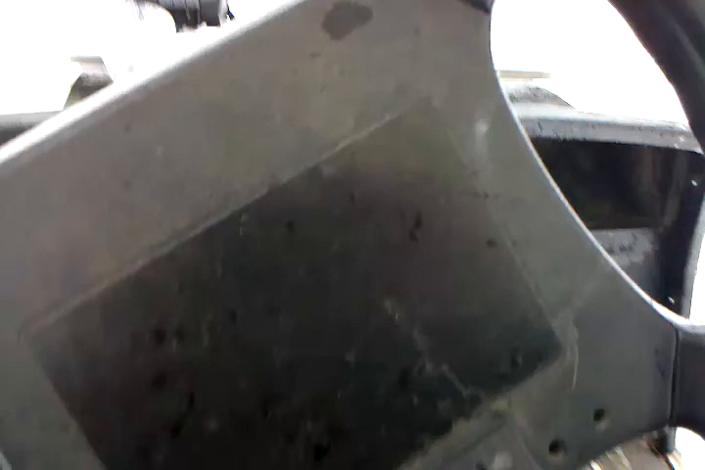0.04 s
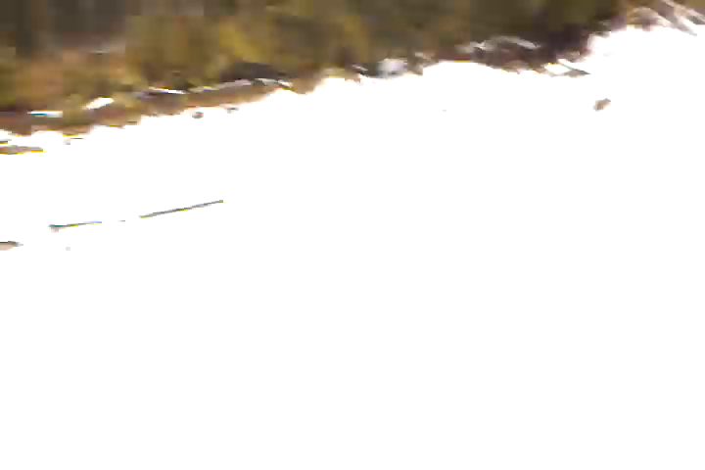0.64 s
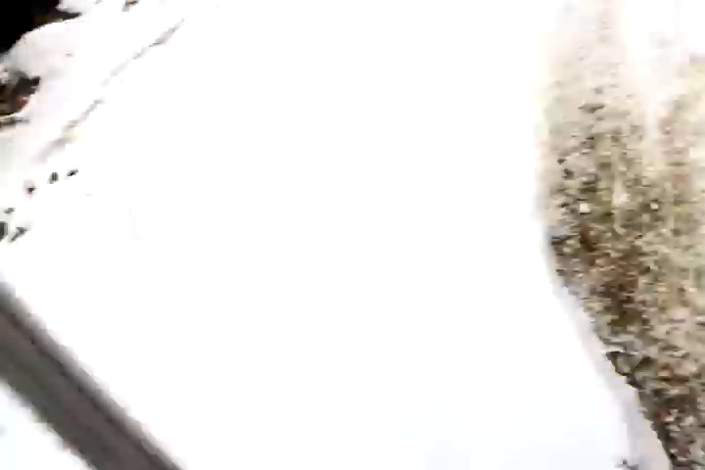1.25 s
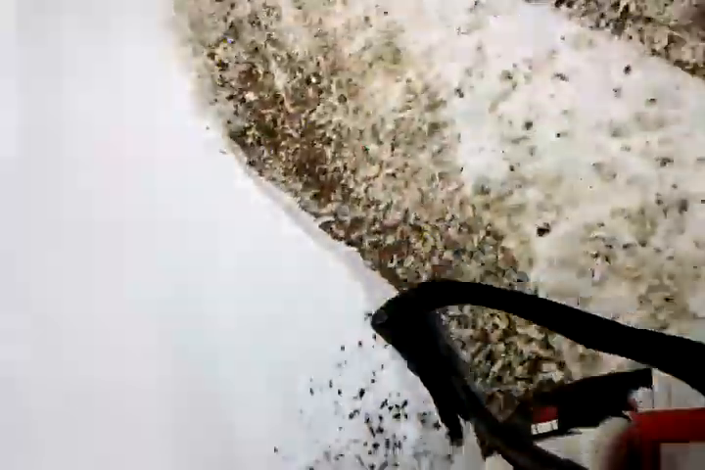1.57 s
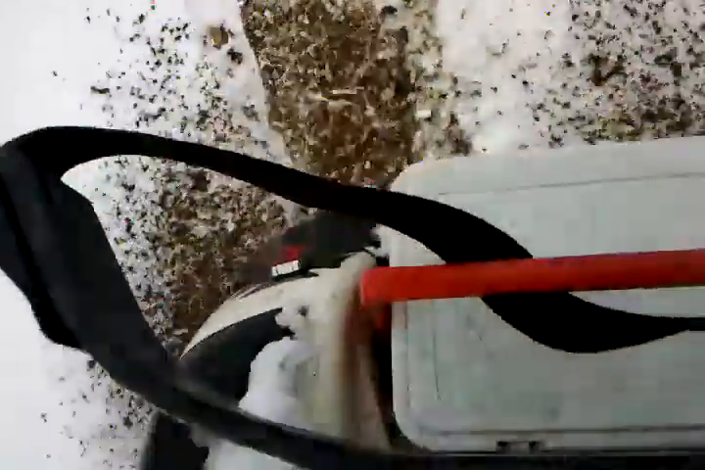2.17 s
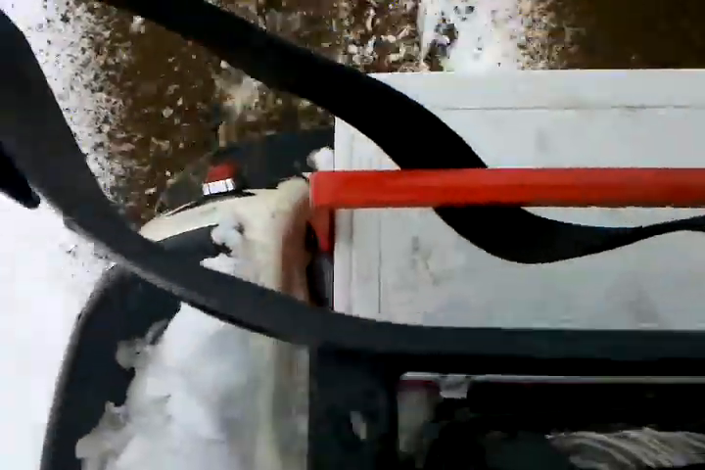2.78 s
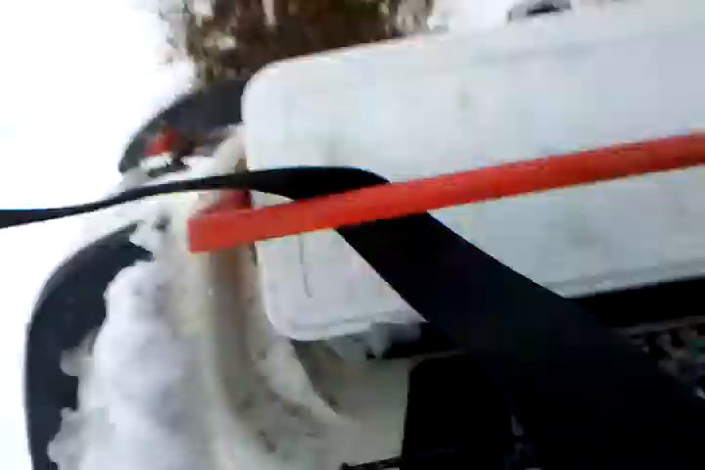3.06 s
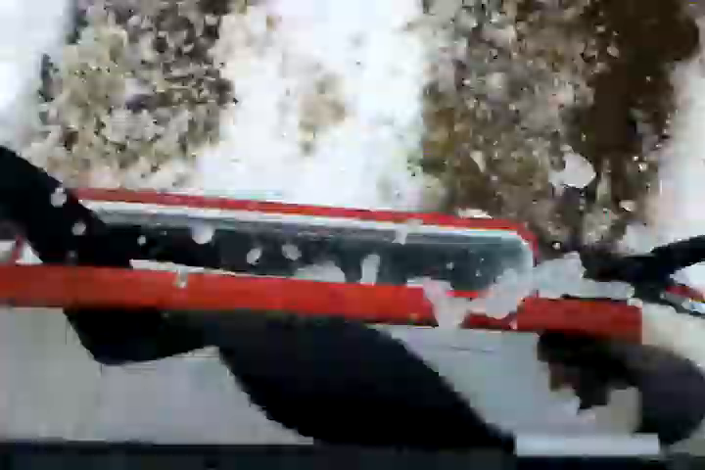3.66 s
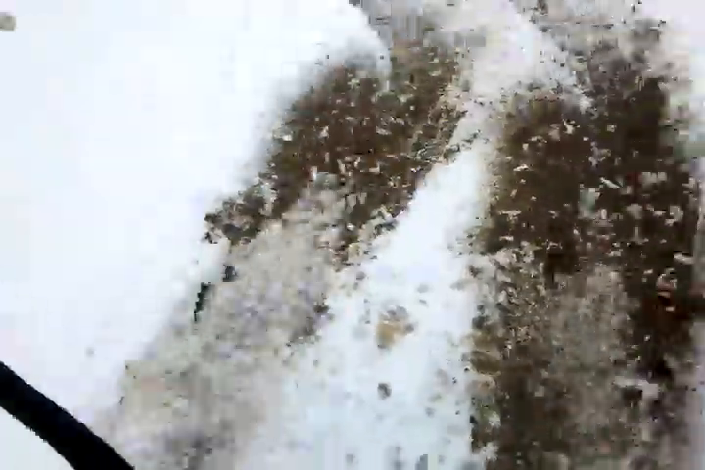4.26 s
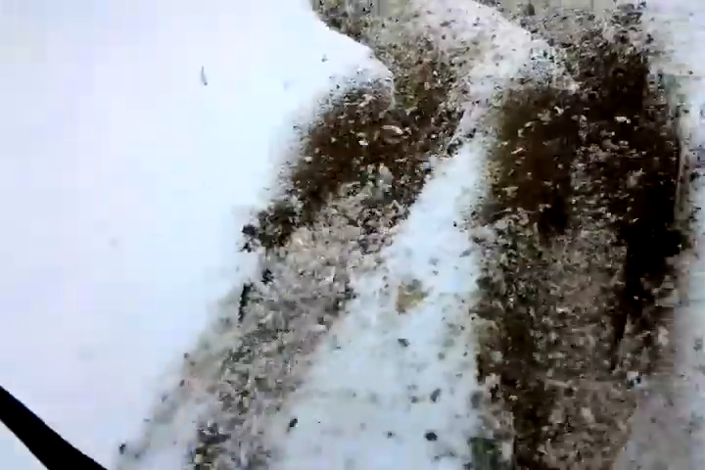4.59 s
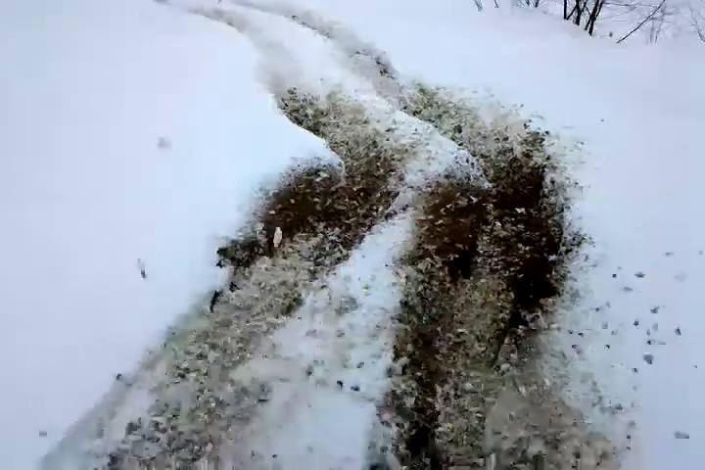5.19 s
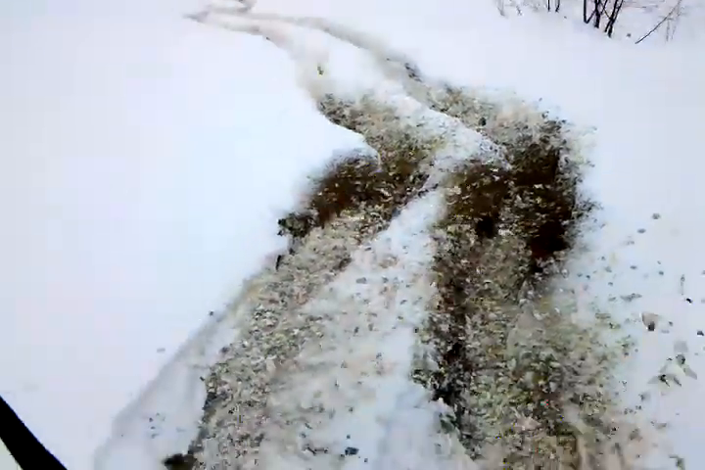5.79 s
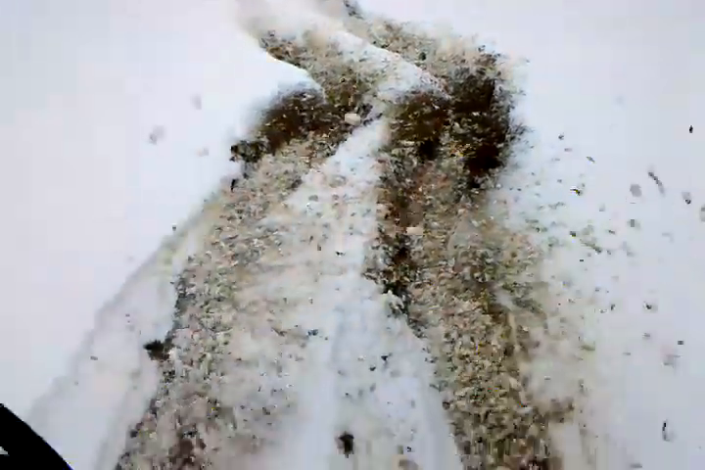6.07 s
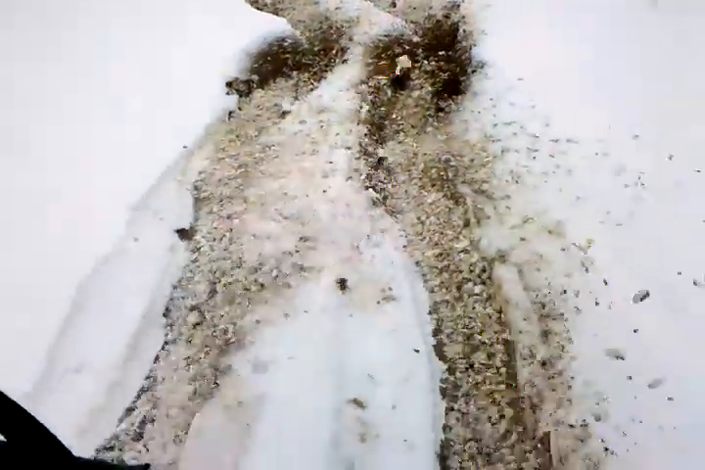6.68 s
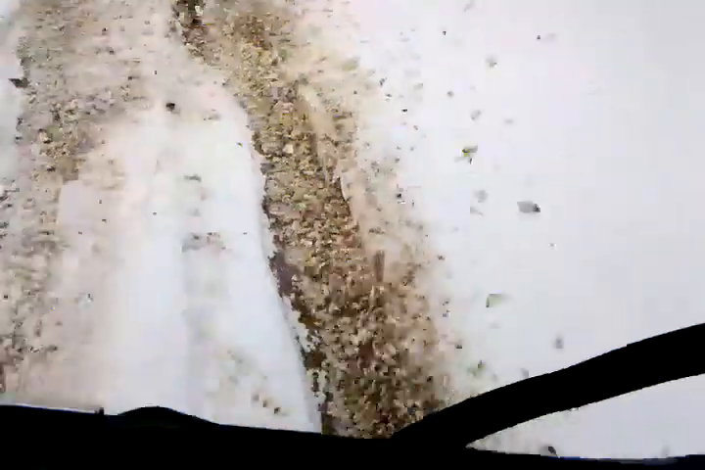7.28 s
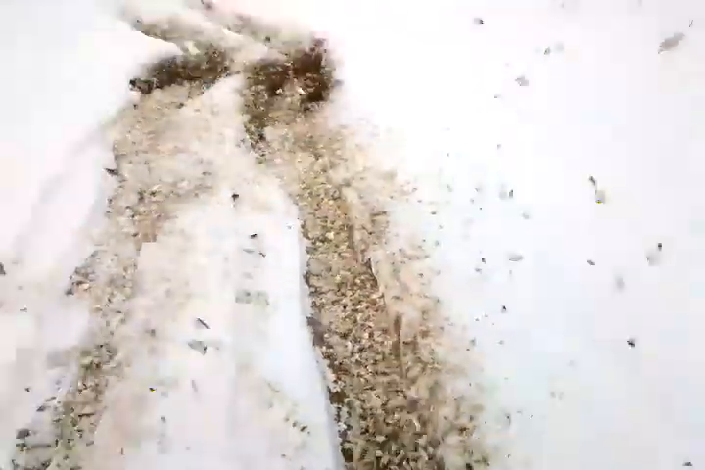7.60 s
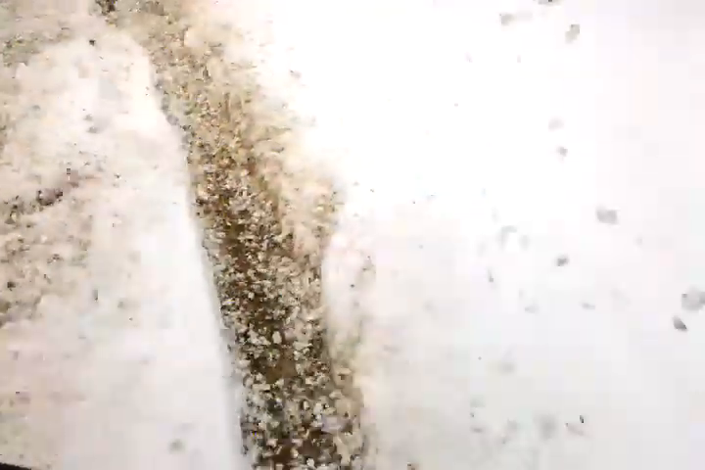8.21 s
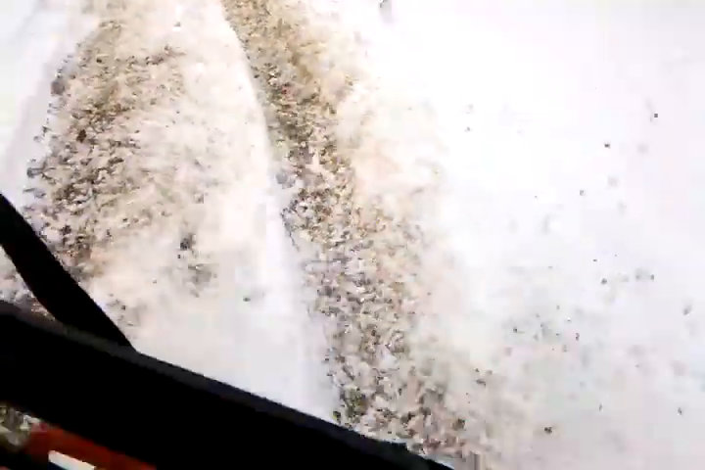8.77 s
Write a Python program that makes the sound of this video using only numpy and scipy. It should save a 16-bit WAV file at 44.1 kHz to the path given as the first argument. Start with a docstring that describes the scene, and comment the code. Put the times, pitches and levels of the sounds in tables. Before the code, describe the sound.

After a moment of silence, a golf cart's single-cylinder petrol engine cranks, catches and speeds up into a steady, thumping putter with a raspy exhaust and rattling covers. Wet snow crunches faintly under the tyres. Before the midpoint, a rut sets off a quick cluster of hollow plastic clacks and booms as the engine surges. It drones on, with two small ticks of grit. Heard outdoors from the seat through a small, slightly overloading microphone.

```python
"""A single-cylinder petrol engine starts and drives a golf cart along a slushy track, heard from the seat.
Each firing sends a pressure pulse through the muffler's resonances and lets out two rasps of turbulent
gas, while the engine forces its covers and mounts into vibration. The tyres crunch wet snow.
A rut jolts the hollow plastic body and its load, overloading the small microphone; later two grains
of grit tick and the sound skips once."""
import sys
import numpy as np
from scipy import signal
from scipy.fft import rfft, irfft, next_fast_len
from scipy.io import wavfile
from scipy.ndimage import uniform_filter1d

SR = 44100
rng = np.random.default_rng(int(sys.argv[2]) if len(sys.argv) > 2 else 0)


def wrap_up_sound(samples):
    """Save the sound to the file named by the first command line argument, as 16-bit audio."""
    columns = np.atleast_2d(samples).T
    # keep every value between -1 and 1, then stretch to whole-number steps
    tamed = np.clip(columns, -1, 1)
    steps = np.round(tamed * 32767).astype(np.int16)
    wavfile.write(sys.argv[1], SR, steps)


N = 389844
TIME = np.arange(N) / SR
FFT_SIZE = next_fast_len(N + SR // 2)
FREQ = np.maximum(np.arange(FFT_SIZE // 2 + 1) * SR / FFT_SIZE, 1e-3)

# engine speed: time_s, firing_hz
FIRING_RATE = [(0.8, 13.48), (1.08, 17.04), (1.38, 23.72), (1.9, 25.46), (2.65, 30.4), (3.15, 28.98),
               (3.33, 25.33), (3.52, 29.7), (4.12, 31.33), (4.92, 29.79), (5.76, 29.76), (5.82, 30.18),
               (6.26, 29.48), (6.75, 30.24), (7.74, 30.19), (8.55, 31.4), (8.84, 31.43)]
# body boom against the thump, as the microphone leans over the rear: time_s, boom_gain
REAR_LEAN = [(3.2, 0.072), (3.36, 0.93), (4.1, 0.71), (5.0, 0.034), (7.7, 0.044), (8.3, 0.46)]
# lift of the rasp as the microphone faces the tailpipe: time_s, lift_db
TAILPIPE_FACING = [(1.4, -4.5), (1.7, 6.5), (2.35, 6.5), (2.95, 1), (3.2, 7.5), (4.15, 8), (4.6, 0.5),
                   (6.1, -0.5), (7.4, 0.5), (8.84, -3)]
# muffler resonances: centre_hz, width_hz, lift_db
MUFFLER_MODES = [(61, 34, 19.5), (90, 15, -2), (141.7, 31, 5), (177, 36, 5), (212.3, 17, 5.5),
                 (237.2, 30.5, 6), (273.7, 37.6, 8.5)]
# resonances of the engine covers: centre_hz, width_hz, lift_db
COVER_MODES = [(426, 27, -3), (638, 20, 6.5), (935, 68, 2.5), (1630, 90, 3), (1920, 420, 2), (2842, 68, 4),
               (3545, 82, 3), (3977, 120, 4)]
# modes of the plastic body: centre_hz, width_hz, level_db
BODY_MODES = [(213, 57, 4.5), (444, 54, 1), (520, 58, -10), (925, 44, -24.5), (1490, 250, -22.5),
              (2220, 300, -28.5), (3200, 2800, -19)]
# mount tones against the thump, over the rear deck and over the track: firing_multiple, deck_db, track_db
MOUNT_TONES = [(11, -13, -10.5), (11.97, -16.5, -19), (13.1, -25, -15), (14.07, -21, -16.5),
               (15.96, -13.5, -27.5), (17, -22.5, -26.5), (18.05, -25.5, -25.5), (19.01, -22, -17.5),
               (21, -18.5, -17), (21.97, -22.5, -16), (23.97, -20.5, -23.5), (27.66, -22, -27.5),
               (33.5, -22.5, -39), (36.8, -38.5, -25.5)]
# spectral envelope of the clatter: frequency_hz, level_db
CLATTER_SPECTRUM = [(50, -50.5), (90, -17.5), (130, -2.5), (220, -3.5), (320, -4.5), (500, -6.5), (800, -8),
                    (1200, -10.5), (1800, -18), (2800, -18), (7000, -31.5)]
# spectral envelope of the gas noise: frequency_hz, level_db
RASP_SPECTRUM = [(200, -20.5), (700, -8), (1400, -4.5), (2300, -3), (3200, 2), (4700, 0.5), (5600, -1.5),
                 (6800, -9), (8000, -19.5)]
# loose panels that buzz for a while: start_s, end_s, centre_hz, nominal_width_hz, level_db
LOOSE_PANELS = [(1.1, 1.523, 658, 128, -31), (1.6, 3.096, 1040, 356, -31.5), (3.6, 4.85, 971, 68.3, -32.5),
                (3.9, 4.805, 1560, 122, -36), (4.5, 7.097, 2120, 163, -35.5),
                (7.3, 8.838, 1636, 102.5, -37.5), (7.7, 8.845, 1007, 80, -37)]
# blows to the body and its load: start_s, relative_clack_db, relative_boom_db, decay_s
RUT_JOLTS = [(3.234, -10.5, -11.5, 0.014), (3.48, -9, -12.5, 0.029), (3.556, -12.5, -16.5, 0.012),
             (3.604, -10, -12, 0.044), (3.623, -5.5, -12, .018), (3.645, -8, -9.5, 0.012),
             (3.666, -33.5, 2.5, 0.012), (3.687, -26, -9.5, 0.065), (3.864, -37.5, -13, 0.041),
             (3.91, -21.5, -24, 0.032), (3.959, -41, -23, 0.037)]
# impacts of grit: start_s, level_db
GRIT_TICKS = [(3.999, -1), (6.041, -8.5)]

START_S, CATCH_S, CRANKING_DB = 0.813, 1.107, -18.5  # cranking swells until the engine catches
CRUISE_HZ = 30  # firing rate
THUMP_DB, CLATTER_DB, RASP_DB = -17.5, -24, -27.5  # base levels at cruising speed
THUMP_RISE_DB, CLATTER_RISE_DB, RASP_RISE_DB = 12.5, 8, 15  # per doubling of engine speed
# the throttle opens briefly to pull the cart out of the rut
SURGE_S, SURGE_ATTACK_S, SURGE_RELEASE_S, SURGE_DB = 3.27, 0.064, 0.25, 6.5
SKIP_S, SKIP_LENGTH_S, TOP_HZ = 6.5148, 0.010, 15800


def undb(db):
    """Amplitude ratio of a level in decibels."""
    return 10 ** (np.asarray(db) / 20)


def curve(table):
    """Linear interpolation of (time_s, value) points."""
    return np.interp(TIME, *np.transpose(table))


def band(hz, width):
    """Response of a damped resonator, gain 1 at its centre."""
    return 1 / (1 + 1j * (FREQ ** 2 - hz ** 2) / (FREQ * width))


def lifts(modes):
    """Resonators in cascade, each raising or lowering its own band."""
    return np.prod([1 + (undb(db) - 1) * band(hz, width) for hz, width, db in modes], axis=0)


def colour(points):
    """Spectral envelope through (frequency_hz, level_db) points."""
    hz, db = np.transpose(points)
    return undb(np.interp(np.log(FREQ), np.log(hz), db))


def through(x, response):
    """Linear filtering: the spectrum is multiplied by a response."""
    return irfft(rfft(x, FFT_SIZE) * response, FFT_SIZE)[:N]


def delayed(x, lag_s):
    """Propagation delay along a longer path."""
    return np.interp(TIME - lag_s, TIME, x)


def unit(x):
    """Normalisation to rms 1."""
    return x / np.sqrt(np.mean(x ** 2))


def noise():
    """White Gaussian noise."""
    return rng.standard_normal(N)


def wander(rate_hz):
    """Continuous random fluctuation with a spread near 1."""
    return np.interp(TIME * rate_hz, np.arange(4096), rng.standard_normal(4096))


def per_cycle(cycles, spread_db):
    """Cycle-to-cycle variation: a random gain held for each firing."""
    return undb(spread_db * rng.standard_normal(1024))[cycles.astype(int)]


def puff(cycles, start, rise):
    """A periodic pulse that opens at phase `start`, peaks `rise` cycles later and decays."""
    age = (cycles - start) % 1 / rise
    return age ** 2 * np.exp(2 * (1 - age))


def body_response():
    """Modal superposition: the hollow plastic body responds as the sum of its modes."""
    return sum(undb(db) * band(hz, width) for hz, width, db in BODY_MODES)


def effort_db(firing_hz, rise_db):
    """Level against cruising: a power law of speed, lowered by cranking and raised by the throttle."""
    doublings = np.log2(firing_hz / CRUISE_HZ)
    cranking = np.interp(TIME, [START_S, CATCH_S], [1, 0])
    surge = np.interp(TIME - SURGE_S, [0, SURGE_ATTACK_S, SURGE_ATTACK_S + SURGE_RELEASE_S], [0, 1, 0])
    return rise_db * doublings + CRANKING_DB * cranking + SURGE_DB * surge


def exhaust_thump(cycles, firing_hz):
    """Monopole radiation: pressure follows the rate of change of the flow, filtered by the muffler."""
    # the valve opens; a weaker push from the piston follows, strongest as the engine labours at low speed
    blowdown = puff(cycles, start=-0.03, rise=0.0074) * per_cycle(cycles, spread_db=0.5)
    push = puff(cycles, start=0.3384, rise=0.0072) * per_cycle(cycles, spread_db=2.5)
    labour = np.interp(firing_hz, [24.5, 29], [0.45, 0.17])
    pressure = np.gradient(-blowdown - labour * push)
    pipe = band(134.3, 228) ** 2 * band(209.0, 260) / (1 + 1j * FREQ / 330)
    thump = unit(through(pressure, pipe * lifts(MUFFLER_MODES)))
    # reflections off canopy and body swell and fade as the microphone moves
    thump += sum(0.39 * wander(1.562) * delayed(thump, lag_s) for lag_s in (0.011, 0.017, 0.024))
    thump += curve(REAR_LEAN) * unit(through(thump, body_response()))
    running_rms = np.sqrt(uniform_filter1d(thump ** 2, size=SR // 3) + 1e-6)
    return thump / running_rms


def mount_and_belt_drone(cycles, firing_hz):
    """Forced vibration: the block shakes its mounts, and the belt whines, in step with the crank."""
    toward_track = np.interp(TIME, [3.9, 5.0], [0, 1])  # the microphone turns away from the deck
    mounts = 0
    for multiple, deck_db, track_db in MOUNT_TONES:
        # a tone grows as it passes through the body's strong panel mode
        resonance_db = 5 / (1 + ((multiple * firing_hz - 435) / 9) ** 2)
        level_db = deck_db + toward_track * (track_db - deck_db) + resonance_db + 2.3 * wander(5)
        phase = 2 * np.pi * (multiple * cycles + rng.random()) + 0.053 * wander(4.5)
        mounts += undb(level_db) * np.sin(phase)
    belt_db = np.interp(firing_hz, [29.6, 31], [-31, -20])
    belt = undb(belt_db) * np.sin(2 * np.pi * 32 * cycles + 0.15 * wander(10))
    speed_db = np.interp(firing_hz, [25.5, 29.3], [-9, 0])
    return np.sqrt(2) * (mounts + belt) * undb(speed_db)


def engine_clatter(cycles, covers_db):
    """Structure-borne sound: combustion and valve gear excite the covers and loose panels."""
    blows = puff(cycles, start=0.13, rise=0.15) + 0.97 * puff(cycles, start=0.51, rise=0.11)
    shake = (0.87 + blows * per_cycle(cycles, spread_db=0.64)) * undb(0.5 * wander(9))
    covers = colour(CLATTER_SPECTRUM) * lifts(COVER_MODES)
    clatter = unit(through(noise() * shake, covers)) * undb(covers_db)
    rattle = noise() * shake
    for start, end, hz, width, db in LOOSE_PANELS:
        fade = np.interp(TIME, [start - 0.15, start + 0.092, end - 0.1, end + 0.25], [0, 1, 1, 0])
        clatter += undb(db) * fade * unit(through(rattle, band(hz, 1.2 * width) ** 2))
    return clatter


def tailpipe_rasp(cycles, facing_db):
    """Turbulent jet noise: gas leaves at blowdown and again as the piston sweeps the cylinder."""
    blowdown = puff(cycles, start=0.12, rise=0.084) * per_cycle(cycles, spread_db=0.97)
    sweep = np.exp(-0.5 * ((cycles % 1 - 0.56) / 0.11) ** 2) * per_cycle(cycles, spread_db=1.0)
    # the puffs stand out most when the microphone faces the tailpipe
    steady_flow = np.interp(facing_db, [-2.5, 0, 6], [0.5, 0.35, 0.2])
    sharpness = np.interp(facing_db, [2.5, 6], [1.05, 1.45])
    flow = steady_flow + blowdown ** sharpness + 0.79 * sweep ** sharpness
    turbulence = noise() * flow * undb(0.6 * wander(450))
    gas = through(turbulence, colour(RASP_SPECTRUM) * lifts(COVER_MODES))
    # a nearby panel reflects it; the path wanders with the hand that holds the microphone
    return unit(gas + 0.39 * delayed(gas, lag_s=0.0031 + 0.000099 * wander(2)))


def starter_hum(cycles):
    """A rotational tone: the starter-generator's pitch rises with the engine it spins."""
    level_db = np.interp(TIME, [0.9, 1.03, 1.15, 1.35, 1.6], [-74, -34, -36, -31, -64])
    return np.sqrt(2) * undb(level_db) * np.sin(2 * np.pi * 5 * cycles)


def tyre_slush():
    """Shot noise: wet snow crunches under the rolling tyres in dense random impulses."""
    grains_per_s = 900
    grains = noise() * (rng.random(N) < grains_per_s / SR)
    grains *= undb(1.8 * np.minimum(rng.exponential(size=N), 4))
    rolling = np.clip((TIME - 1.1) / 3.6, 0, 1)
    return unit(through(grains, band(3200, 4000))) * rolling * undb(-41.5 + 2 * wander(5.9))


def knock(start_s, decay_s):
    """Envelope of a damped impact: a sudden rise and an exponential fall."""
    age = np.maximum(TIME - start_s, 0)
    return (1 - np.exp(-age / 0.00082)) * np.exp(-age / decay_s)


def rut_jolts():
    """Impact excitation: loose parts clack on the body, whose panels boom over a dull chassis thud."""
    clack_envelope = sum(undb(db) * knock(start, decay) for start, db, _, decay in RUT_JOLTS)
    boom_envelope = sum(undb(db) * knock(start, decay) for start, _, db, decay in RUT_JOLTS)
    panels = unit(through(noise(), body_response()))
    chassis = undb(-41) * unit(through(noise(), band(77, 77) ** 2))
    clacks = clack_envelope * unit(through(noise(), band(1200, 1900) * band(1600, 8500)))
    # the blows reach mainly the middle modes of the panels
    boom = through(boom_envelope * (panels + chassis), band(420, 350))
    return undb(-4.5) * clacks + undb(5) * boom


def grit_ticks():
    """Brief contact gives a bright spectrum: single grains strike hard plastic."""
    envelope = sum(undb(db) * knock(start, decay_s=0.0011) for start, db in GRIT_TICKS)
    return envelope * unit(through(noise(), band(7000, 3000)))


def scene():
    """Superposition: the engine's sounds share one cycle phase; slush, jolts and grit add to them."""
    firing_hz = curve(FIRING_RATE)
    cycles = np.cumsum(firing_hz) / SR
    facing_db = curve(TAILPIPE_FACING)
    # the thump spreads more evenly than the rasp, so it takes only a share of the directional lift
    thump_db = THUMP_DB + effort_db(firing_hz, THUMP_RISE_DB) + 0.22 * facing_db
    covers_db = CLATTER_DB + effort_db(firing_hz, CLATTER_RISE_DB)
    rasp_db = RASP_DB + effort_db(firing_hz, RASP_RISE_DB) + facing_db
    engine = (exhaust_thump(cycles, firing_hz) + mount_and_belt_drone(cycles, firing_hz)) * undb(thump_db)
    engine += engine_clatter(cycles, covers_db)
    engine += tailpipe_rasp(cycles, facing_db) * undb(rasp_db)
    cart = engine + starter_hum(cycles) + tyre_slush() + rut_jolts() + grit_ticks()
    return (cart * (TIME > START_S))[None]


def record(dry):
    """Saturation and band limiting: a small microphone clips on the jolts and loses the high treble."""
    microphone = colour([(20, -15), (55, 1), (6900, -2), (7500, -21), (8200, -29.5), (9500, -54)])
    overloaded = np.clip(dry[0], -0.8, 0.8)
    heard = np.clip(through(overloaded, microphone), -0.73, 0.73)
    # the sound skips once, repeating a hundredth of a second
    heard = heard[np.arange(N) - int(SKIP_LENGTH_S * SR) * (TIME > SKIP_S)]
    lowpass = signal.ellip(8, 0.2, 70, TOP_HZ, fs=SR, output="sos")
    return signal.sosfilt(lowpass, heard)[None]


dry = scene()
out = record(dry)
wrap_up_sound(out)
```